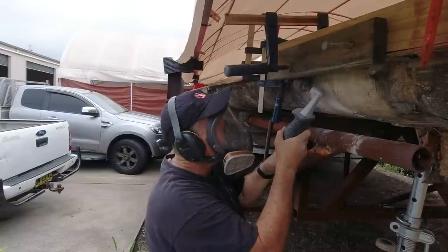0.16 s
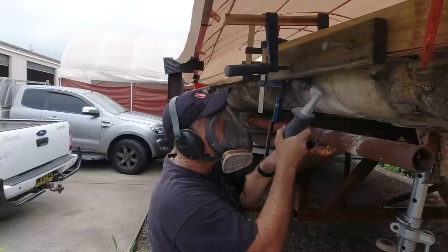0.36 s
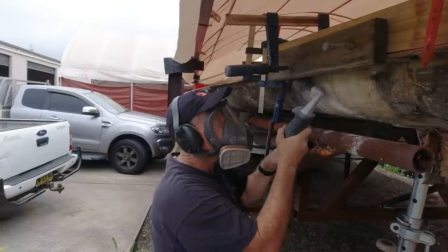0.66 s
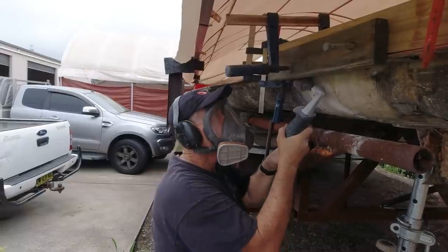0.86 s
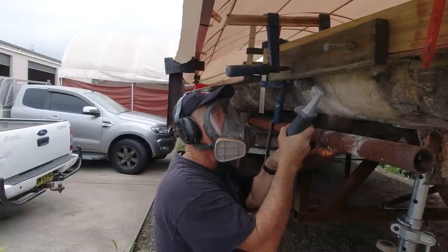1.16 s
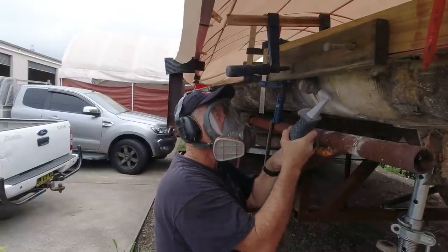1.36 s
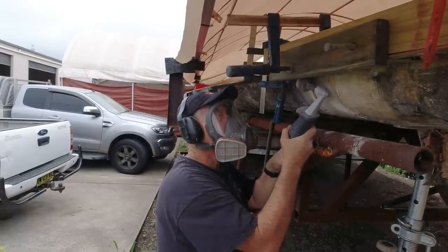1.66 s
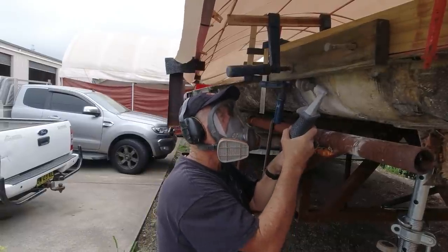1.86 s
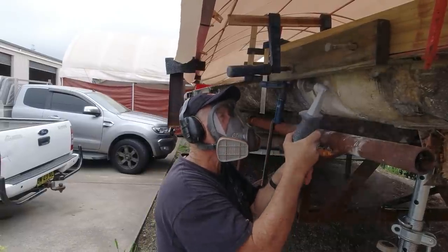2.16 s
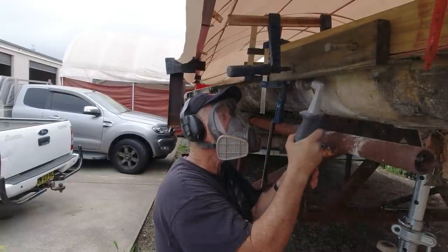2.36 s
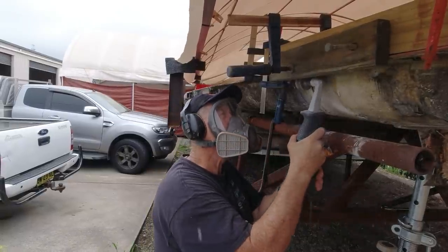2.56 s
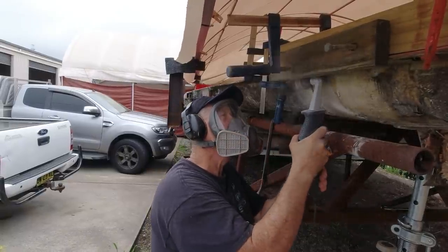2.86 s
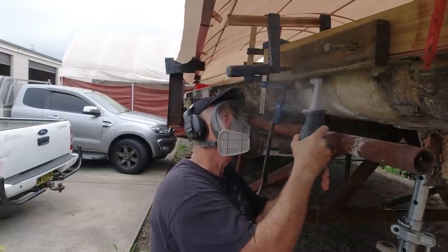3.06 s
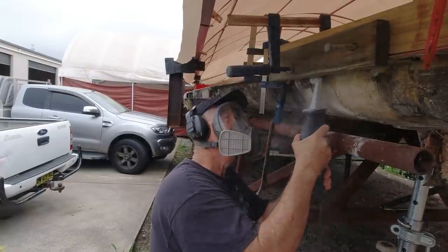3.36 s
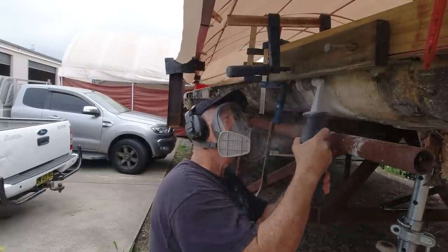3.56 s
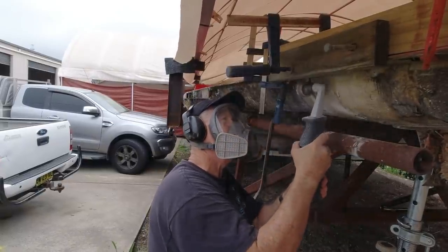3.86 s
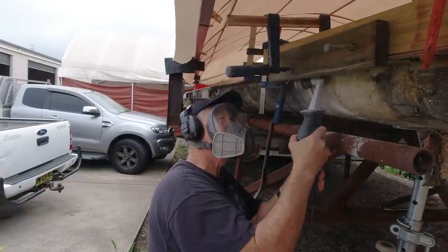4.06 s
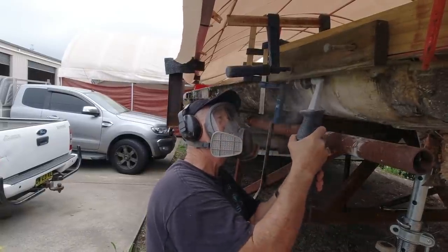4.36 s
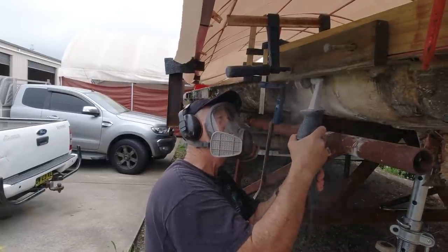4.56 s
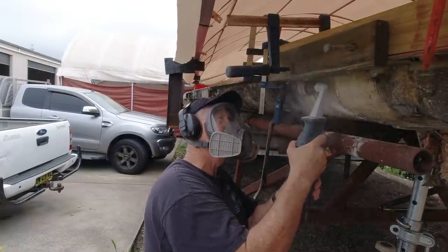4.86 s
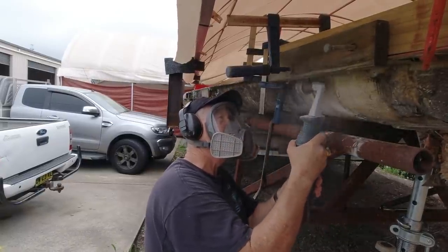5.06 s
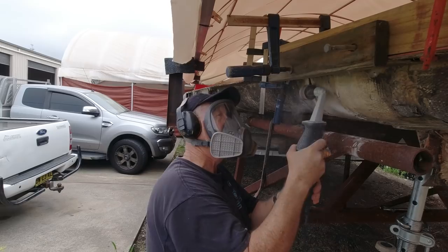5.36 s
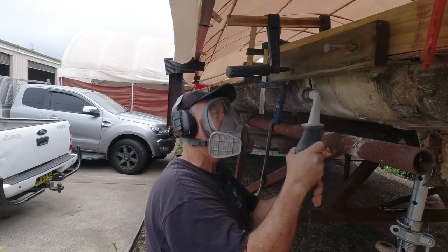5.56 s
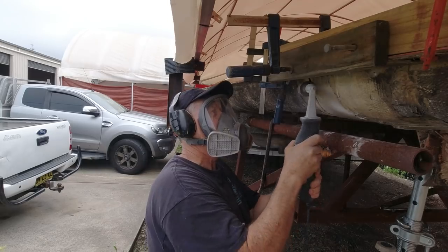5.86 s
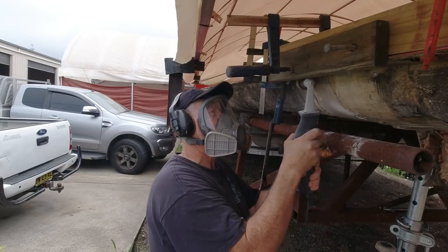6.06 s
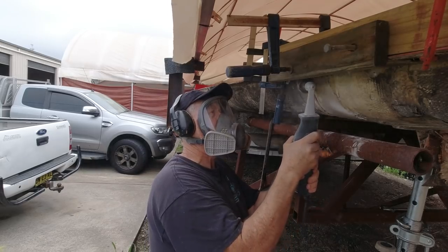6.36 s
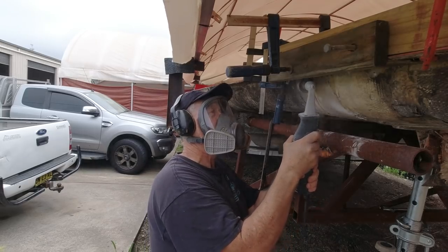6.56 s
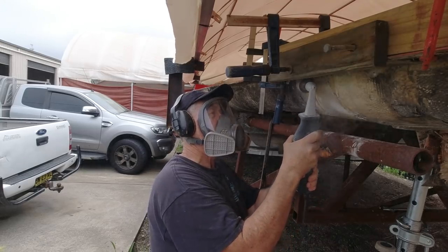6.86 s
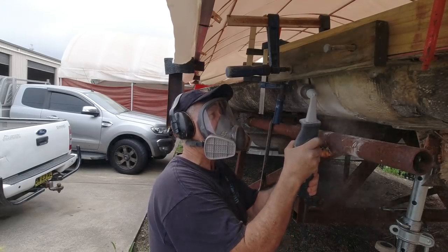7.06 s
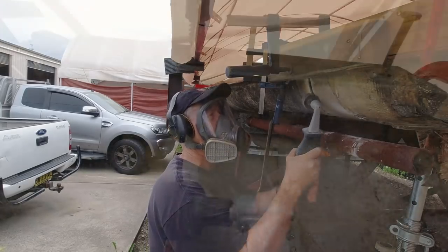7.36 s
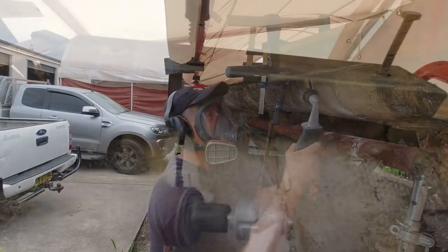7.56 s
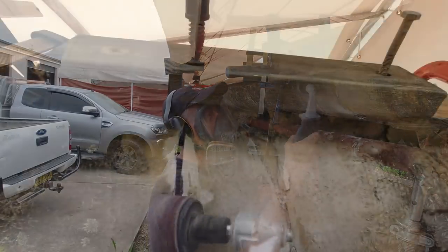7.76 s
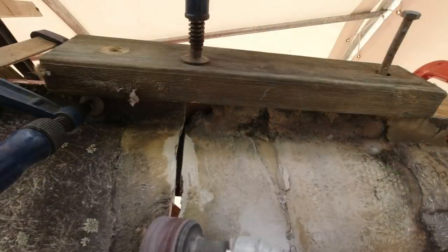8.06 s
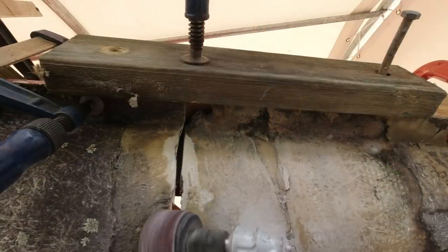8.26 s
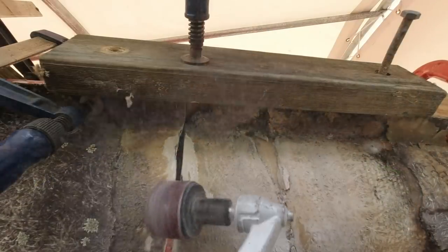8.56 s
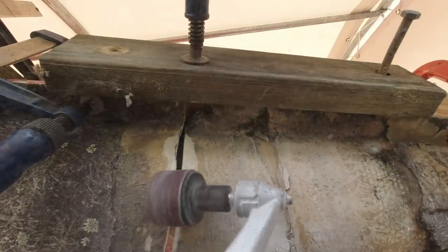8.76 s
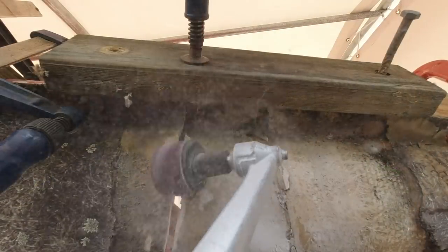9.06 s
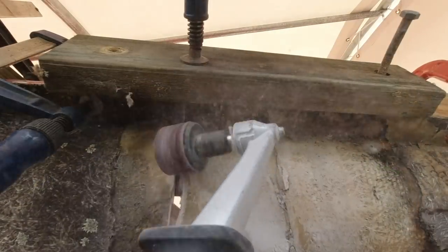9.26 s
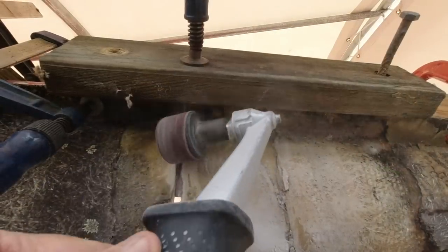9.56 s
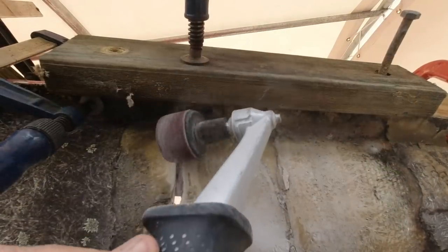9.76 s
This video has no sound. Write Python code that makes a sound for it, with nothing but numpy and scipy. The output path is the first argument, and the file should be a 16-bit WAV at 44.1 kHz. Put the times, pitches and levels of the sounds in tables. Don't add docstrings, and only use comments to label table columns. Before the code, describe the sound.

A continuous electric grinder whine with singing gears and rushing cooling air, heard outdoors under a cover with little echo. The sanding drum is pressed and eased repeatedly, giving bright, flickering abrasive hiss and coarse chatter. A deep bog-down is followed by quick recovery. The second part is nearer and more resonant, with a small knock, then fading hiss. Low wind buffets strike the two closely spaced microphones.

```python
import sys
import numpy as np
from scipy import signal
from scipy.fft import rfft, irfft, next_fast_len
from scipy.io import wavfile
from scipy.ndimage import uniform_filter1d, map_coordinates

SR = 44100
rng = np.random.default_rng(int(sys.argv[2]) if len(sys.argv) > 2 else 0)


def volts_from_decibels(level):
    exponent = np.asarray(level, float) / 20
    return 10 ** exponent


def wav_record(signal):
    frames = np.transpose(np.atleast_2d(signal))
    bounded = np.clip(frames, -1, 1)
    quanta = np.round(bounded * 32767).astype(np.int16)
    wavfile.write(sys.argv[1], SR, quanta)


N = 437031
SECONDS = np.arange(N) / SR
COARSE = np.arange(N // 40 + 2) * 40 / SR
DRUM_RATIO = .2272
TOUCH_S = 0.13
LOCK_S = .04
NO_GROWL_DB = -88

# start in seconds, length in seconds, level in dB.
BUMPS = [
    (8.247, 0.019, -57),
]


def in_time(rows):
    s, *columns = np.transpose(rows)
    return [np.interp(SECONDS, s, c) for c in columns]


def at_hz(points, hz):
    points = np.array(points)
    return np.interp(np.log(hz + 1), np.log(points[:, 0] + 1), points[:, 1])


def fine(slow):
    return np.interp(SECONDS, COARSE, slow)


def held(rows, edge_s, rest):
    start, length, *columns = np.transpose(rows)
    following = np.append(start[1:], np.inf)
    end = start + length
    end = np.where(end > following - .06, following, end)

    def ramp(s):
        return np.clip((COARSE - s[:, None]) / edge_s + .5, 0, 1)

    on = ramp(np.where(start > 0, start, -1)) - ramp(end)
    return [fine(r + (c - r) @ on) for c, r in zip(columns, rest)]


def rms_one(x):
    return x / np.sqrt(np.mean(x ** 2) + 1e-20)


def drift(rate):
    r = np.exp(-80 * np.pi * rate / SR)
    noise = rng.standard_normal(len(COARSE) + 2000)
    return rms_one(signal.lfilter([1], [1, -2 * r, r * r], noise)[2000:])


def coloured(x, spectrum):
    size = next_fast_len(N)
    hz = np.arange(size // 2 + 1) * SR / size
    return rms_one(irfft(rfft(x, size) * volts_from_decibels(at_hz(spectrum, hz)), size)[..., :N])


def resonance(x, hz, width):
    r = np.exp(-np.pi * width / SR)
    gain = (1 - r * r) / 2
    return signal.lfilter([gain, 0, -gain], [1, -2 * r * np.cos(2 * np.pi * hz / SR), r * r], x)


def turned():
    turn_s, fade_db_per_s = 8.75, -13.5
    away = np.clip((SECONDS - turn_s) / 0.041 + .5, 0, 1)
    return away, fade_db_per_s * np.clip(SECONDS - turn_s, 0, None)


def line(turns, order, level_db, waver_db, rough):
    level = fine(volts_from_decibels(np.interp(COARSE, SECONDS, level_db) + waver_db * drift(22.4)))
    return np.sqrt(2) * level * np.sin(2 * np.pi * order * turns + rough * fine(drift(34)))


def whine(turns, speed, rotor_db, mesh_db, octave_db, whine_db, growl_db, hum_db):
    # multiple of the rotor speed, level in dB.
    rotor_orders = [(1, 0), (3, -4)]
    # multiple of the rotor speed, level in dB.
    blade_orders = [(12, 0), (13, -10)]
    # multiple of the rotor speed, level in dB.
    whine_orders = [(4.09, 0), (10.2, -10)]
    # multiple of the rotor speed, level in dB.
    mesh_orders = [(8, 0), (7.77, -19)]
    # multiple of the rotor speed, level in dB.
    runout_orders = [(7.64, -13), (8.36, -22)]
    # multiple of the rotor speed, level in dB.
    octave_orders = [(16, 0), (15.9, -13), (15.4, -15), (16.3, -12)]
    # frequency in Hz, level in dB.
    octave_response = [(4800, -2), (5500, -3), (6100, 2), (6400, -3), (6900, -14)]
    # start in seconds, length in seconds, level in dB.
    runouts = [
        (6.75, .4, 2),
        (7.15, .4, 7),
    ]
    # start in seconds, length in seconds, level in dB.
    strains = [(1.0, .12, -61), (1.12, 0.18, -53.5), (2.58, .32, -61), (2.9, .35, -59.5), (3.25, .3, -59),
               (4.33, 0.55, -58.5)]
    # start in seconds, length in seconds, level in dB.
    flutters = [(.8, 0.091, -55), (2.5, 0.32, -55.5), (7.64, 0.23, -55.5), (7.93, 0.205, -56.5),
                (8.55, 0.21, -55.5), (8.8, 0.15, -51.5)]
    # start in seconds, length in seconds, level in dB.
    high_blades = [(0, .42, -68), (1.62, 0.52, -48), (2.28, 0.34, -50), (5.1, .14, -53), (5.5, 0.61, -58.5),
                   (7.3, 0.23, -63)]
    blade_db = -61 - .2 * np.clip(405 - speed, 0, None) - 2 * turned()[0]
    strain_db, = held(strains, 2 * LOCK_S, [-75])
    runout_db = mesh_db + held(runouts, TOUCH_S, [0])[0]
    flutter_db, = held(flutters, LOCK_S, [-80])
    high_blade_db, = held(high_blades, TOUCH_S, [-80])
    loose = .5 * np.clip(-52 - mesh_db, 0, 12)
    growl_orders = [(8 * DRUM_RATIO, 0), (6.5 * DRUM_RATIO, -8)]
    # tones, level in dB, waver in dB, roughness in radians
    families = [
        (rotor_orders, rotor_db + 5, 2.2, .4),
        (blade_orders, blade_db, 2.5, .6),
        (whine_orders, whine_db, 2.5, .4),
        (mesh_orders, mesh_db - 1, 1.3, .25 + loose),
        (runout_orders, runout_db, 3, .6 + loose),
        (octave_orders, octave_db + at_hz(octave_response, 16 * speed), 1.2, .3),
        ([(6.13, 0)], strain_db, 3, .8),
        ([(7.62, 0)], flutter_db, 3, .9),
        (growl_orders, growl_db + 5.5, 1.5, .3),
        ([(9 * DRUM_RATIO, 0)], hum_db - 4.5, 1.5, .35),
        ([(24, 0)], high_blade_db, 3, .7)]
    return sum(line(turns, order, level_db + db, waver_db, rough)
               for orders, level_db, waver_db, rough in families for order, db in orders)


def grit(turns, repeat):
    patterns = rng.standard_normal((2, 40, 441))
    place = [SECONDS * 3, (turns * DRUM_RATIO % 1) * 440]
    worn = np.array([map_coordinates(p, place, order=1) for p in patterns])
    worn = signal.sosfilt(signal.butter(2, 2200, "high", fs=SR, output="sos"), worn)
    fresh = rng.standard_normal((2, N))
    fresh = fresh * volts_from_decibels(3 * rng.standard_normal(N // 8 + 1).repeat(8)[:N])
    share = np.clip(repeat, 0, 1)
    return np.sqrt(share) * rms_one(worn) + np.sqrt(1 - share) * rms_one(fresh)


def grit_levels(pressure_db, growl_db):
    lifted_db = [-69.5, -64.5, -59.5]
    follows = [0.65, 1, 0.83]
    away, fade_db = turned()
    jolts = [(s, length + 0.033, 11) for s, length, db in BUMPS]
    pressure_db = pressure_db + held(jolts, 0.0044, [0])[0]
    panel, housing, dust = (db + share * pressure_db for db, share in zip(lifted_db, follows))
    panel = panel + 0.12 * (growl_db - NO_GROWL_DB) - 3 * away
    return panel, housing + 0.52 * fade_db, dust - 0.5 * away + fade_db


def streaks(x):
    # middle in seconds, width in seconds, pitch in Hz, dB over
    flares = [(.7, .08, 5200, 6), (8.02, .13, 3200, 5), (5.88, .08, 3780, 13), (.5, .14, 3900, 9),
              (.68, .03, 3900, 8), (.84, .03, 3850, 6), (.5, .06, 2880, 6), (9.12, .14, 2800, 9),
              (9.37, .08, 4350, 15), (9.4, .1, 3800, 9), (9.52, .16, 2450, 5), (9.3, .12, 10900, 10),
              (9.32, .05, 9300, 7), (.35, .2, 9700, 5), (.1, .12, 9000, 5), (2.18, .1, 10100, 7),
              (2.17, .08, 8900, 5), (2.95, .08, 10100, 5), (8.1, .12, 9500, 6), (8.1, .1, 8700, 4),
              (.18, .12, 10700, 5), (1.27, .1, 11700, 6), (3.1, .1, 11600, 4), (3.36, .07, 10000, 6),
              (4.35, .25, 10500, 4), (7.5, .17, 10400, 5), (7.52, .08, 8700, 4), (8.88, .12, 11000, 5),
              (8.75, .15, 3830, 6), (8.75, .12, 2720, 5), (8.27, .02, 3550, 7)]
    out = sum(fine(volts_from_decibels(-3 + 5 * drift(2))) * resonance(x, hz, 90) for hz in rng.uniform(8400, 11600, 14))
    for s, width, hz, db in flares:
        span = slice(max(int((s - 3 * width) * SR), 0), int((s + 3 * width) * SR))
        swell = np.exp(-((SECONDS[span] - s) / width) ** 2)
        out[:, span] += volts_from_decibels(db) * swell * resonance(x[:, span], hz, .05 * hz)
    return out


def grinding(turns, levels_db, chatter_db):
    # frequency in Hz, level in dB per Hz.
    grit_far = [(200, -25), (450, -12), (900, -8), (1350, 1), (1900, -7.5), (2500, -8), (3300, -9.5),
                (4200, -8), (5200, 2), (6000, -7.5), (7200, -13), (8100, -12), (9000, -6), (10400, 1.5),
                (11500, -2), (12700, -7), (16000, -9)]
    # frequency in Hz, level in dB per Hz.
    grit_near = [(200, -4), (900, 5), (1400, -8), (2450, 2.5), (3400, -40), (4300, 7), (5300, -30),
                 (7000, -5), (9000, -22), (10100, 1), (10900, -15), (12200, -26), (16000, -6)]
    # time in seconds, swell in dB.
    catches = [(1.377, 10), (1.388, 11), (1.445, 9), (1.49, 11), (1.542, 6), (1.582, 5), (1.604, 4),
               (1.64, 6), (2.161, 9), (2.18, 6), (2.2, 5), (2.206, 8), (2.249, 4), (2.274, 6), (2.34, 6),
               (3.933, 5), (3.959, 5), (3.986, 4), (3.998, 5), (4.017, 5), (4.046, 8), (4.07, 10),
               (4.089, 8), (4.108, 6), (4.127, 6), (4.145, 7), (7.55, 6), (7.665, 6), (7.69, 6), (4.935, 7),
               (8.3, 7), (8.392, 6), (9.055, 12), (9.114, 12), (9.825, 6)]
    # frequency in Hz, width in Hz, level in dB.
    near_rings = [(2450, 200, 6), (3830, 120, 6), (4350, 200, 8), (10900, 400, 8)]
    # frequency in Hz, width in Hz, level in dB.
    housing = [(1090, 25, -8), (2850, 470, -10.5), (3230, 390, -6.5)]
    near = 0.064 + 0.27 * turned()[0]
    skip = np.exp(2.5 * (np.cos(np.pi * DRUM_RATIO * turns + 1.2 * fine(drift(6))) - 1))
    catch_db = fine(sum(db * np.exp(-((COARSE - s) / .002) ** 2) for s, db in catches))
    source = grit(turns, repeat=0.086)
    unsteady = np.clip(1 + 0.3 * fine(drift(60)), 0, 1.5)
    source = source * volts_from_decibels(catch_db + chatter_db * 0.3 * (skip - np.mean(skip)) * unsteady)
    close, together = np.interp(COARSE, SECONDS, near), drift(29)
    edges = 200 * 2 ** (np.arange(20) / 3)
    groups = np.zeros((3, 2, N))
    for k, (low, high) in enumerate(zip(edges, edges[1:])):
        hz = np.sqrt(low * high)
        band = signal.sosfilt(signal.butter(2, [low, high], "band", fs=SR, output="sos"), source)
        shift_db = (at_hz(grit_near, hz) - at_hz(grit_far, hz)) * close
        shift_db = shift_db + 0.54 * together + 1.72 * drift(2.3) + 0.66 * drift(25)
        groups[np.searchsorted([1800, 7000], hz)] += (-1) ** k * band * fine(volts_from_decibels(shift_db))
    out = 0
    for group, level_db, trim_db in zip(groups, levels_db, (1.5, 4, 1.5)):
        group = coloured(group, grit_far)
        slow = np.sqrt(uniform_filter1d(np.mean(group ** 2, axis=0), SR))
        out = out + volts_from_decibels(level_db + trim_db) * group / slow
    close_rings = near * sum(volts_from_decibels(db) * resonance(out, hz, width) for hz, width, db in near_rings)
    out = out + close_rings + streaks(out)
    return out + sum(volts_from_decibels(db + 9.5) * resonance(out, hz, width) for hz, width, db in housing)


def shadowed(x):
    # frequency in Hz, width in Hz, start in seconds.
    shadows = [
        (12400, 700, 9.25),
        (10100, 1100, 9.45),
    ]
    for hz, width, s in shadows:
        x = x - np.clip((SECONDS - s) / .15 + .5, 0, 1) * resonance(x, hz, width)
    return x


def bump():
    # frequency in Hz, level in dB, seconds to die by 60 dB.
    panel = [(517, 5, 0.18), (754, 8, 0.12), (910, -1, 0.067), (2750, 1.5, 0.0062), (3500, 1, 0.0098)]
    push = sum(volts_from_decibels(db) * ((SECONDS > s) & (SECONDS < s + length)) for s, length, db in BUMPS)
    push = push * rng.standard_normal(N) + 1e-18
    return sum(volts_from_decibels(db + 21) * resonance(push, hz, np.log(1000) / np.pi / t60) for hz, db, t60 in panel)


def rumble(growl_db):
    return volts_from_decibels(growl_db + 0.5) * rms_one(resonance(rng.standard_normal((2, N)), 650, 620))


def fan():
    # frequency in Hz, level in dB per Hz.
    air_colour = [(200, -24), (800, -10), (1280, 1), (1800, -42), (3000, 5), (4000, -22), (5100, 10),
                  (7200, -39), (10500, 8.5), (13000, -19), (16000, -18)]
    # time in seconds, level in dB.
    air_level = [(0, -55.5), (3.6, -58), (4, -53.5), (8.9, -59), (9.2, -54.5), (9.91, -105)]
    air = coloured(rng.standard_normal((2, N)), air_colour)
    air = air + resonance(air, 3055, 130)
    return volts_from_decibels(in_time(air_level)[0] + 3.8 * fine(drift(52))) * rms_one(air)


def wind():
    # peak in seconds, width in seconds, dB over the breeze.
    gust_rows = [(.2, 0.76, 0), (1.36, 0.047, 4), (1.45, 0.038, 21), (1.54, 0.046, 7), (1.61, .05, -4),
                 (1.69, 0.025, 21), (1.761, 0.027, 28), (1.8, .03, 19), (1.845, 0.027, 25),
                 (1.95, 0.06, 16), (2.04, 0.17, 6), (2.6, 0.027, -5), (2.796, 0.02, 27), (2.88, 0.1, 11),
                 (3.2, 0.35, 9), (3.2, 0.017, 9), (3.74, .04, 5), (3.93, .03, 9), (4.29, 0.086, 3),
                 (5.56, 0.058, 4), (5.65, 0.025, 8), (7.6, 0.046, 14), (7.68, 0.055, 27), (7.74, .03, 3),
                 (8.33, 0.033, 0), (8.42, 0.019, 26.5), (8.49, 0.076, 24.5), (8.57, 0.051, 22.5),
                 (8.689, .03, 3), (8.785, 0.013, 17), (8.86, 0.05, -10), (9.6, 0.22, -2)]
    # frequency in Hz, level in dB per Hz.
    gust_colour = [(12, -43), (20, 1.5), (60, -1), (134, -4.5), (338, -15), (640, -29), (700, -18),
                   (910, -67), (1540, -120)]
    puffs = rng.standard_normal((3, N))
    lumps = volts_from_decibels(2.5 * np.array([fine(drift(14)), fine(drift(14))]))
    gusts = fine(1 + sum(volts_from_decibels(db) * np.exp(-((COARSE - s) / width) ** 2) for s, width, db in gust_rows))
    breeze_db = -80.5
    return volts_from_decibels(breeze_db) * gusts * rms_one(coloured(puffs[:2] + 0.58 * puffs[2], gust_colour) * lumps)


def ports(tones, paths):
    # frequency in Hz, left's lead in radians, likeness from 0 to 1.
    between = [(0, 0, .9), (1400, -.65, .94), (1900, -.35, .88), (2400, -1, .8), (3450, -.85, .8),
               (4300, -1, .4), (4900, -2.6, .85), (5600, -3.65, .8), (6000, -4.6, .7), (6500, -5.5, .45),
               (7100, -5.6, .1), (8600, -6, .55), (9400, -9.5, .2), (10700, -11.1, .6), (11500, -12.9, .6),
               (12900, -13, .2), (16000, -12.6, .45)]
    size = next_fast_len(N + 4096)
    hz = np.arange(size // 2 + 1) * SR / size
    sides = np.array([[1], [-1]])
    at, lead, alike = np.transpose(between)
    lead, alike = np.interp(hz, at, lead), np.interp(hz, at, alike)
    shared, own = rfft(paths, size)
    noise = np.sqrt((1 + alike) / 2) * shared + np.sqrt((1 - alike) / 2) * own * sides
    tilt = 0.025 + .3 * np.exp(-((hz - 5250) / 350) ** 2)
    heard = rfft(tones, size) * (1 + tilt * sides) + noise
    return irfft(heard * np.exp(.5j * lead * sides), size)[:, :N]


def scene():
    # time in seconds, turns per second.
    rotor_speed = [(0, 463), (.45, 479), (.76, 464), (.87, 447), (1.01, 426), (1.15, 398), (1.27, 372),
                   (1.33, 368), (1.4, 388), (1.46, 402), (1.58, 426), (1.8, 425), (1.94, 420), (2.04, 413),
                   (2.5, 451), (2.76, 441), (2.92, 420), (3.01, 406), (3.09, 386), (3.23, 345), (3.3, 323),
                   (3.43, 306), (3.54, 297), (3.59, 306), (3.63, 324), (3.8, 392), (4.05, 430), (4.34, 425),
                   (4.55, 404), (4.74, 384), (4.8, 380), (4.88, 387), (5.15, 438), (5.75, 470), (5.95, 475),
                   (6.15, 469),
                   (6.4, 450), (6.535, 442), (6.575, 428), (6.85, 423.5), (6.89, 416.5), (7.15, 419.5),
                  (7.52, 429.5), (7.64, 443), (7.799, 451), (8.4, 447.4), (8.6, 460), (8.999, 449.2),
                  (9.35, 465.6)]
    # start in seconds, length in seconds, pressure as dB of hiss over a
    # lifted drum, chatter depth in dB, drum whine in dB.
    passes = [(0, 0.57, 10, 15, -76), (.6, .76, 12.5, 5, -66), (1.55, .5, 11.5, 14, -67.5),
              (2.05, 0.44, 6.5, 10, -74), (2.45, .45, 12, -4, -59), (2.9, .2, 9.5, 4, -72),
              (3.1, .15, 8.5, 3, -63), (3.25, 0.37, 9, 6, -68), (3.96, 0.13, 2.5, 19, -99),
              (4.06, .25, 12, 12, -64), (4.31, 0.62, 10, 1, -69), (5.23, 0.22, 11, 28, -68),
              (5.43, .38, 3.5, 18.5, -75), (5.81, .17, 8.5, 16, -73), (5.98, 0.6, 12, 3, -62),
              (6.55, 0.94, 10, -1, -64.5), (7.55, .35, 7, 19, -68), (7.9, .25, 9.5, 2, -58),
              (8.38, 0.22, 5.5, 11, -74), (8.55, 0.21, 8.5, 3, -63), (8.76, 0.22, 9.5, 8, -68),
              (9.2, 0.36, 9.5, 9, -68.5), (9.5, 0.59, 10.5, 4, -76)]
    # start in seconds, length in seconds, gear tone in dB, octave in dB,
    # drum hum in dB.
    sings = [(0, 0.46, -62, -86, -64.5), (.66, .16, -53.5, -74, -72), (.82, .17, -52, -72, -66),
             (.99, .1, -45.5, -72, -82), (1.09, .09, -53.5, -56, -80), (1.2, .06, -53, -51, -91),
             (1.26, .07, -51, -47, -91), (1.33, .3, -63, -80, -91), (1.64, .31, -46.5, -57, -92),
             (1.95, .1, -53.5, -55, -82), (2.05, 0.86, -57, -56, -67), (2.84, .12, -43.5, -50, -72),
             (2.96, .11, -46.5, -44, -62.5), (3.07, .09, -46, -40.5, -62.5), (3.16, .13, -53, -37.5, -60),
             (3.29, .12, -59.5, -45, -62), (3.41, .15, -60, -52, -63.5), (3.56, .05, -48.5, -52, -70),
             (4.16, 0.14, -49, -72, -71), (4.32, .13, -42.5, -51, -70), (4.45, .12, -43.5, -56, -73),
             (4.58, .13, -48.5, -51, -64), (4.71, .08, -41, -46.5, -69), (4.79, .08, -41.5, -53, -62),
             (4.87, 0.05, -50.5, -68, -65), (5.3, 0.16, -58.5, -84, -87), (5.8, .17, -58, -80, -68),
             (5.97, .15, -58, -80, -67.5), (6.12, .41, -54.5, -87, -66.5), (6.53, .5, -45, -55, -83),
             (7.0, .25, -44.5, -62, -88), (7.22, .23, -46.5, -72, -84), (7.44, .1, -50.5, -70, -86),
             (7.54, 0.63, -60, -83, -92), (8.55, 0.45, -60, -87, -68), (9.25, 0.33, -62, -67, -76),
             (9.58, .2, -61, -61, -81)]
    # start in seconds, length in seconds, level in dB.
    growls = [(1.0, 0.15, -81), (3.17, 0.44, -71.5), (4.3, .4, -89), (6.3, 0.35, -80), (6.6, 0.44, -73.5),
              (7.2, 0.34, -72), (8.62, 0.2, -77.5), (8.76, 0.19, -64)]
    # turns per second, level in dB.
    rotor_by_speed = [(300, -80), (400, -80.5), (420, -77.5), (450, -71.5), (478, -69.5)]
    free_speed = 478
    speed, = in_time(rotor_speed + [(N / SR, free_speed)])
    speed = uniform_filter1d(speed, size=int(.035 * SR))
    turns = np.cumsum(speed) / SR
    pressure_db, chatter_db, whine_db = held(passes, TOUCH_S, [0, 4, -90])
    mesh_db, octave_db, hum_db = held(sings, LOCK_S, [-72, -86, -86])
    growl_db, = held(growls, 0.065, [NO_GROWL_DB])
    rotor_db = at_hz(rotor_by_speed, speed) + 1.1 * turned()[1] + .5 * (pressure_db - 23.5)
    tones = whine(turns, speed, rotor_db, mesh_db, octave_db, whine_db, growl_db, hum_db) + bump()
    paths = grinding(turns, grit_levels(pressure_db, growl_db), chatter_db) + fan() + rumble(growl_db)
    return ports(tones, shadowed(paths)) + wind()


def roll_off(x):
    return signal.sosfilt(signal.butter(12, 15790, fs=SR, output="sos"), x)


def record(dry):
    return roll_off(dry)


dry = scene()
out = record(dry)
wav_record(out)
```